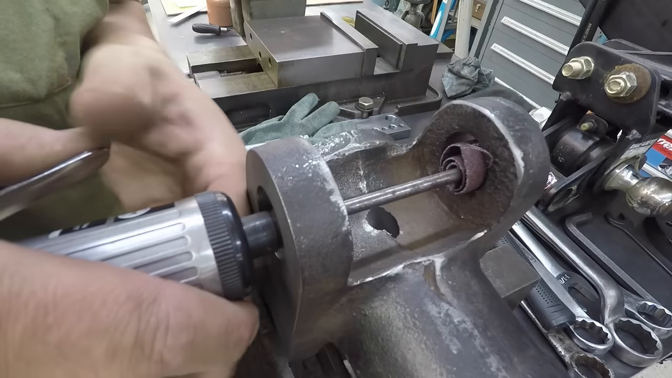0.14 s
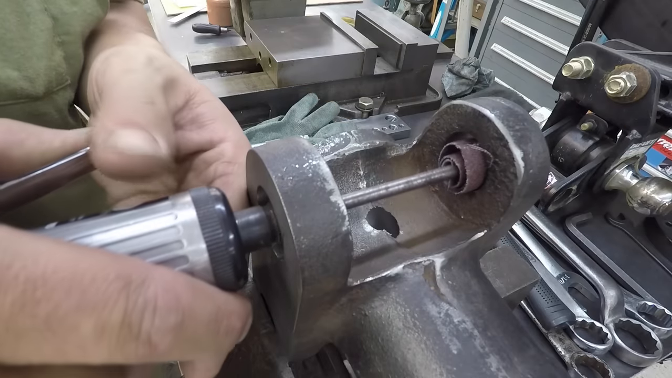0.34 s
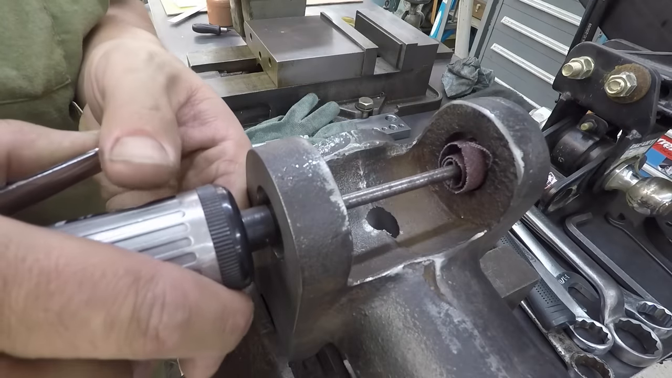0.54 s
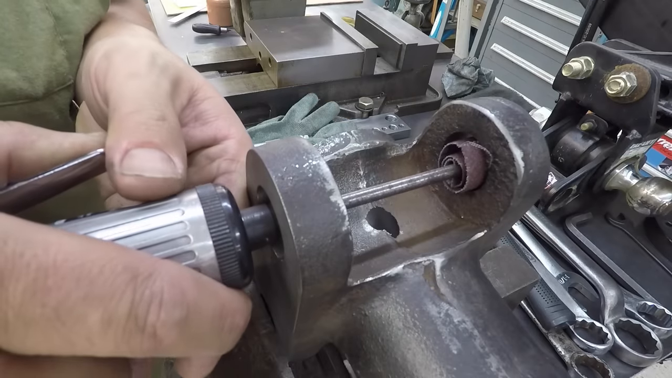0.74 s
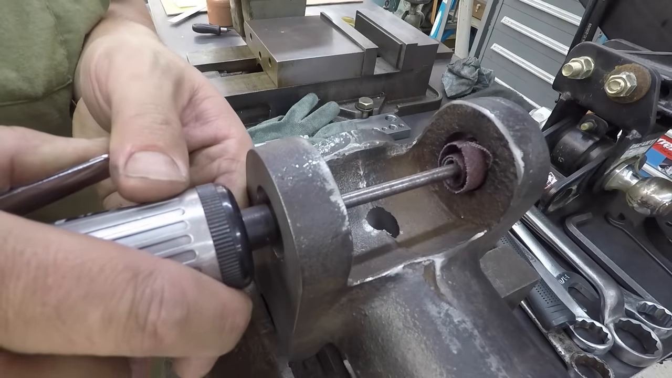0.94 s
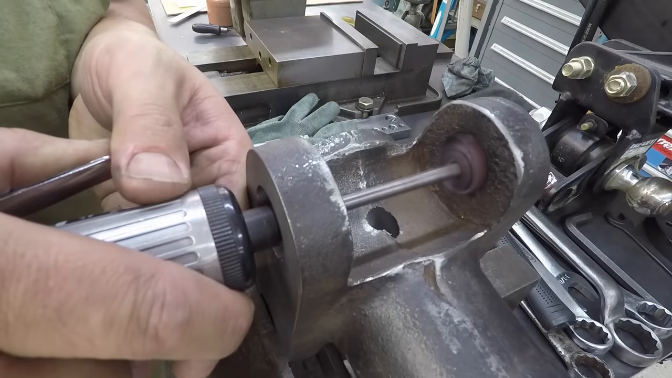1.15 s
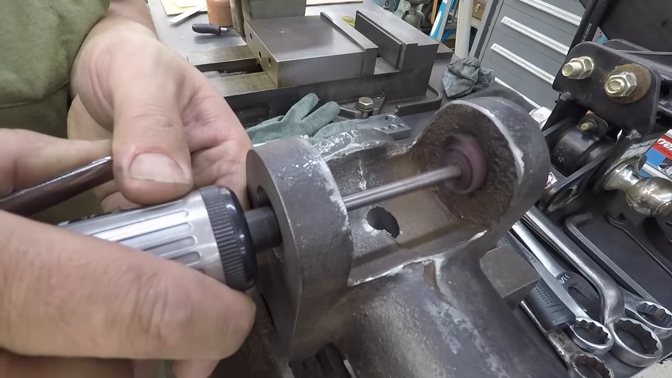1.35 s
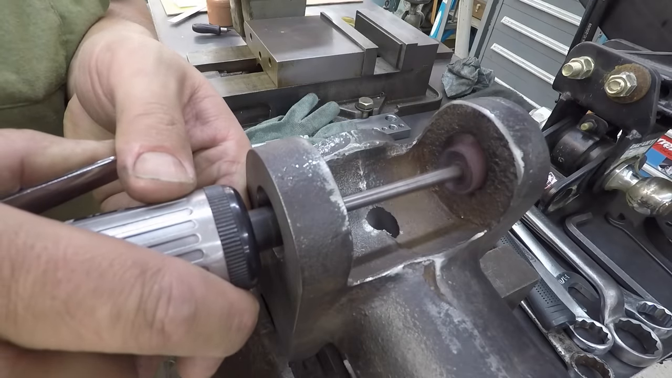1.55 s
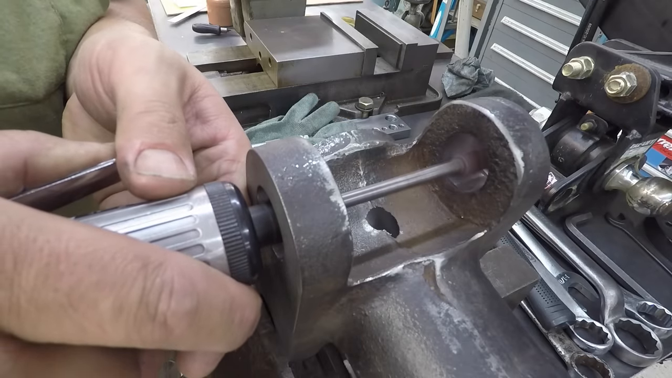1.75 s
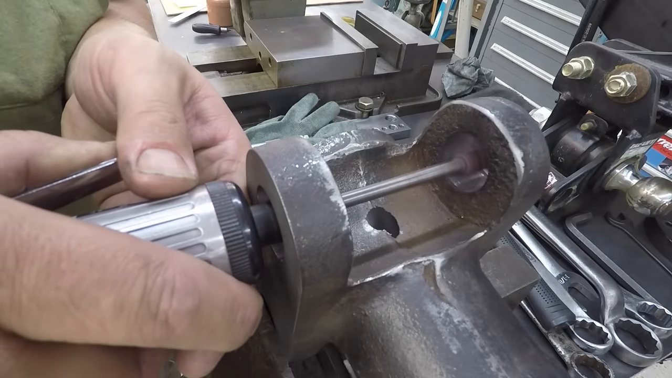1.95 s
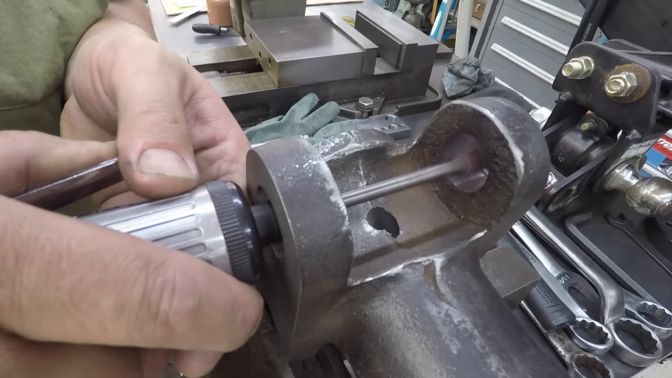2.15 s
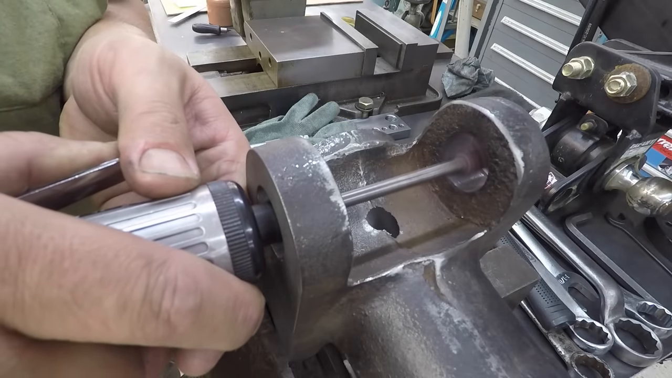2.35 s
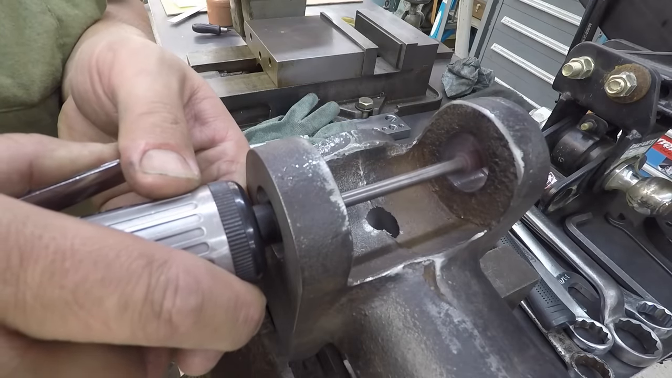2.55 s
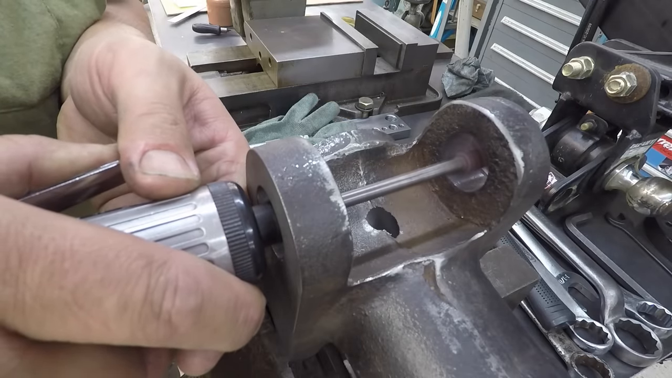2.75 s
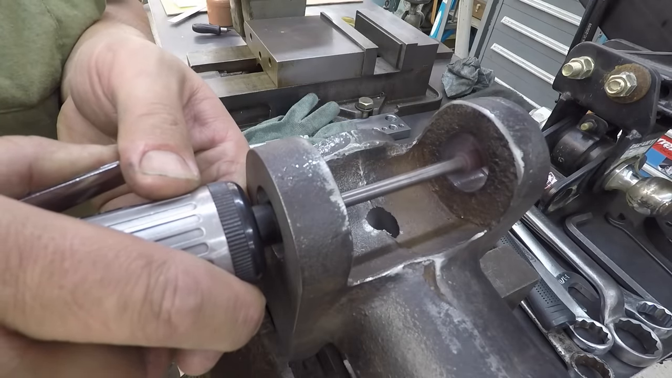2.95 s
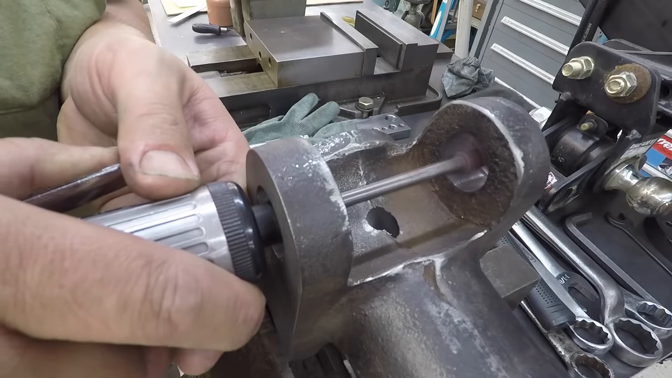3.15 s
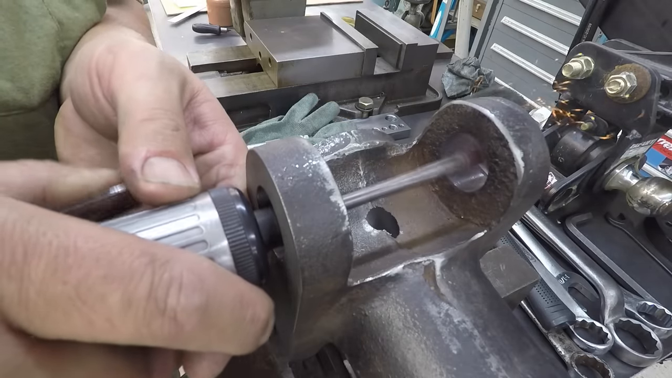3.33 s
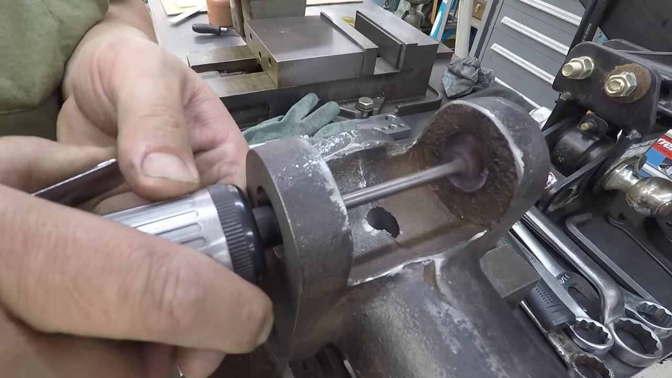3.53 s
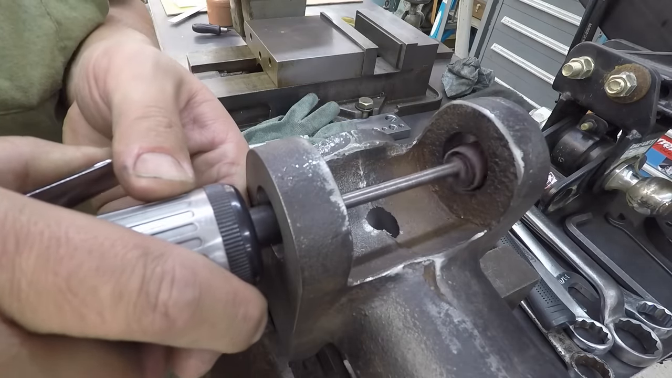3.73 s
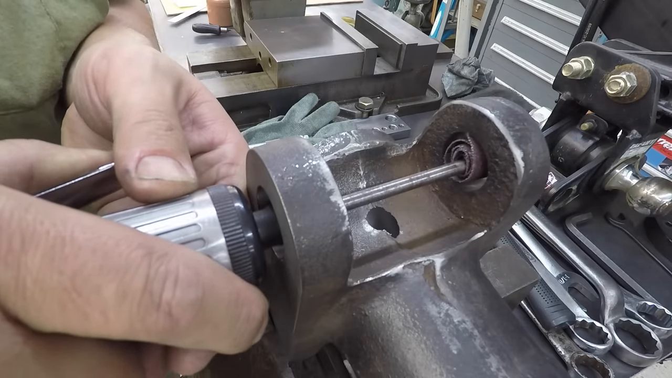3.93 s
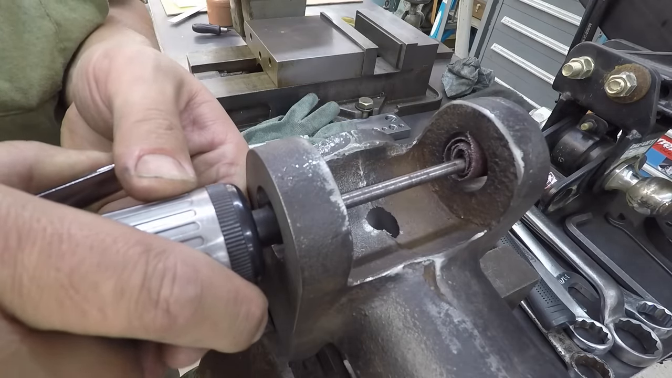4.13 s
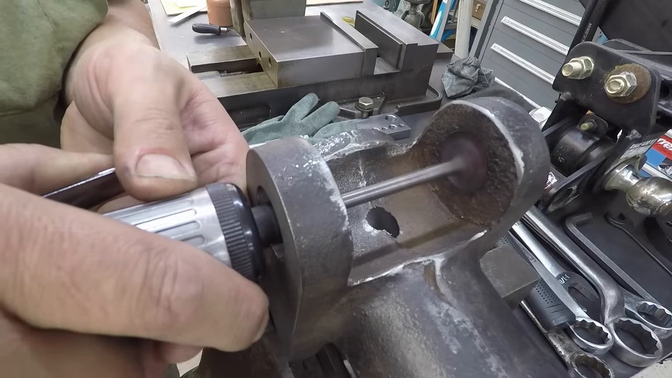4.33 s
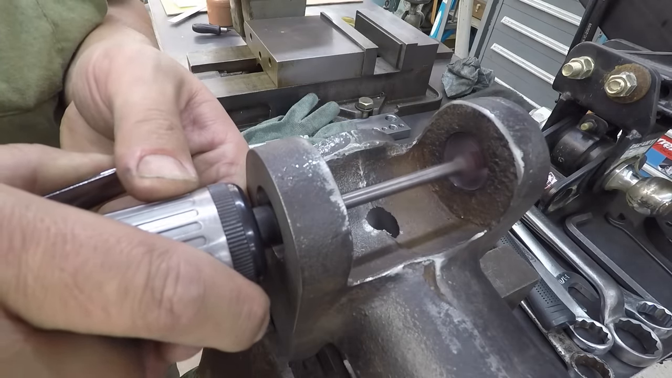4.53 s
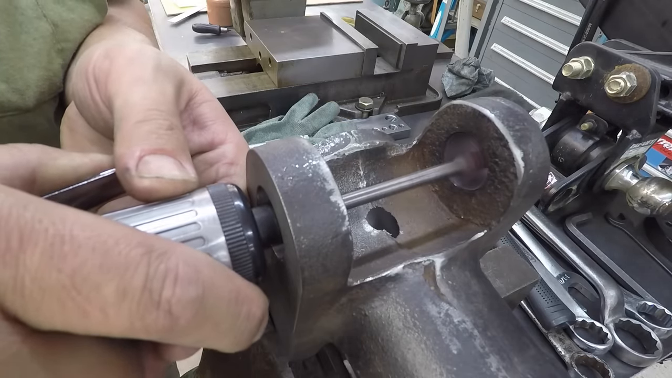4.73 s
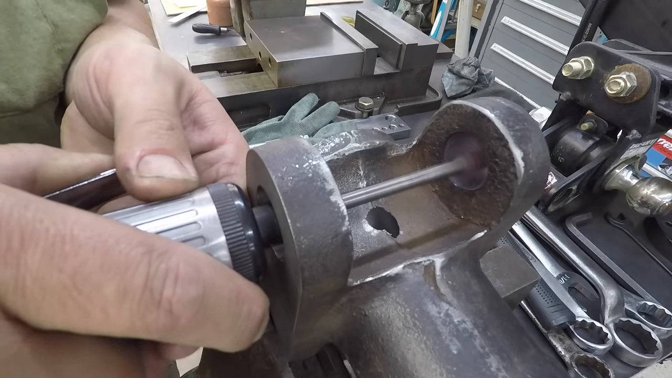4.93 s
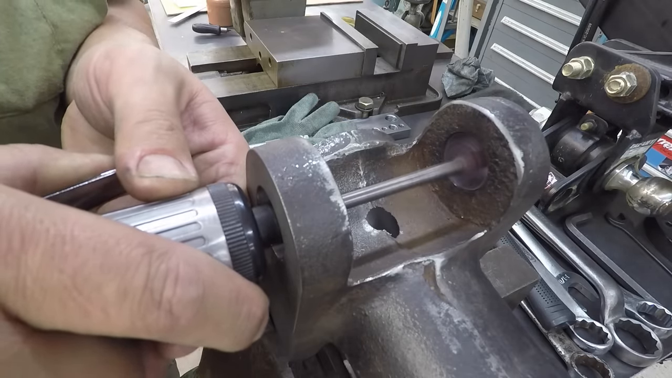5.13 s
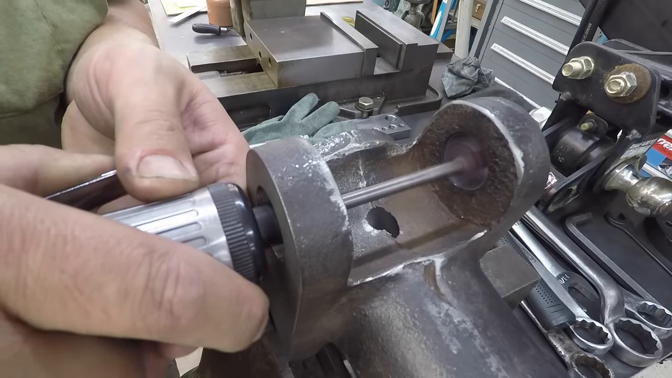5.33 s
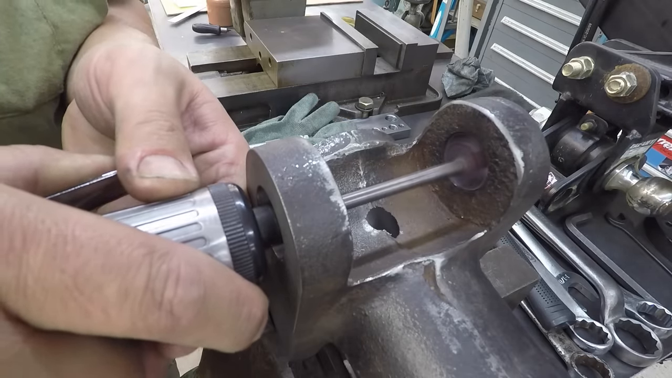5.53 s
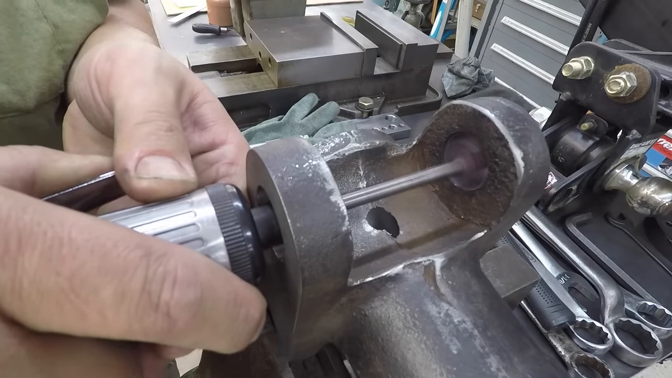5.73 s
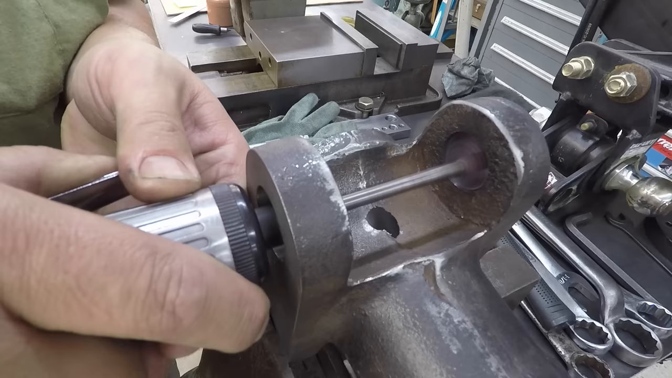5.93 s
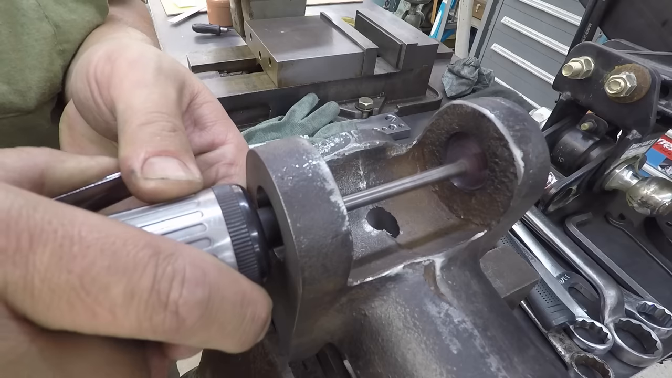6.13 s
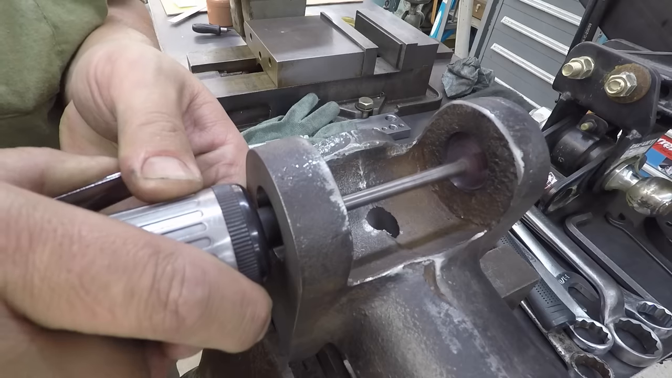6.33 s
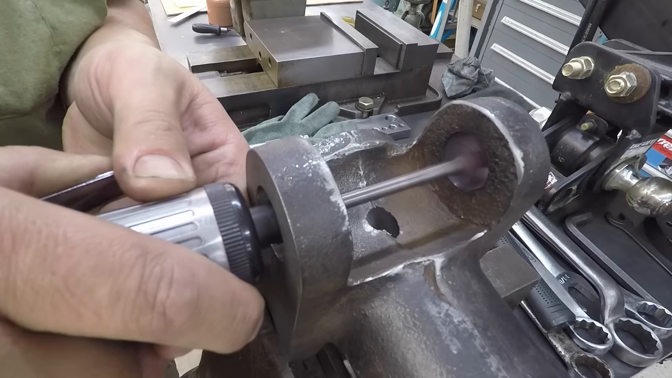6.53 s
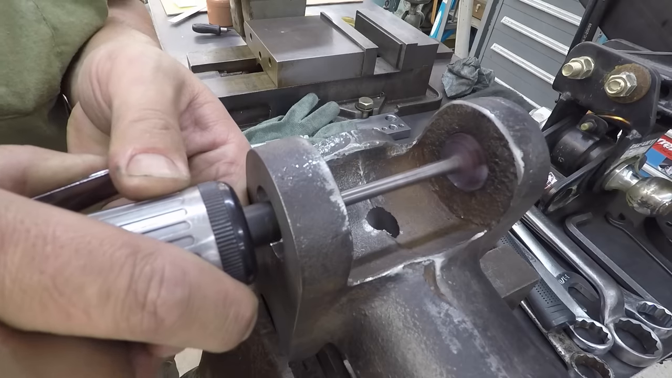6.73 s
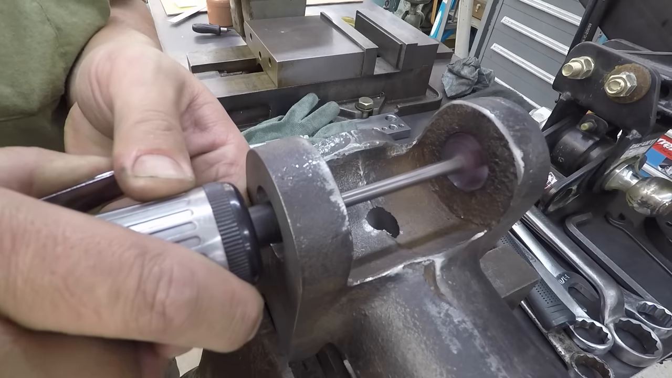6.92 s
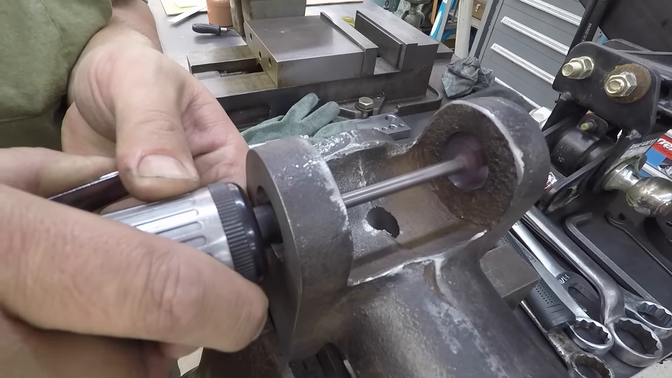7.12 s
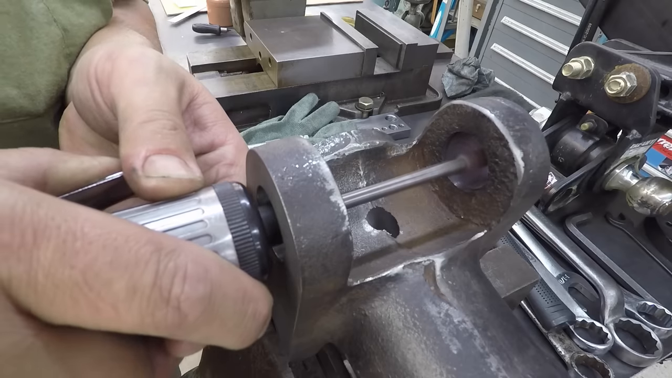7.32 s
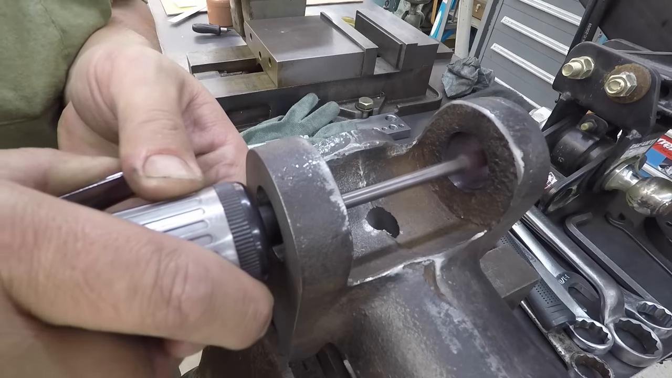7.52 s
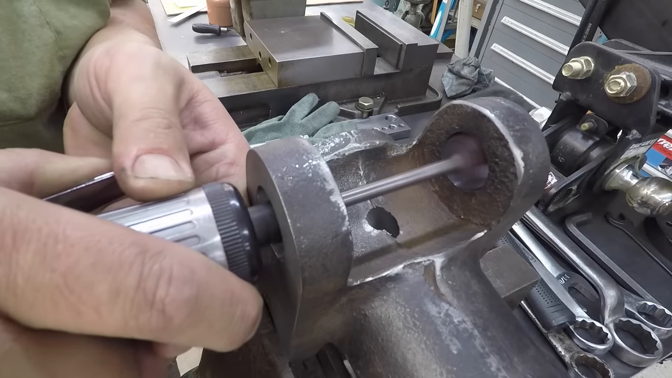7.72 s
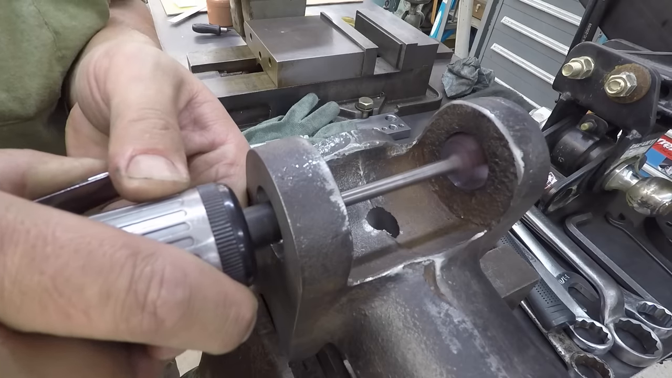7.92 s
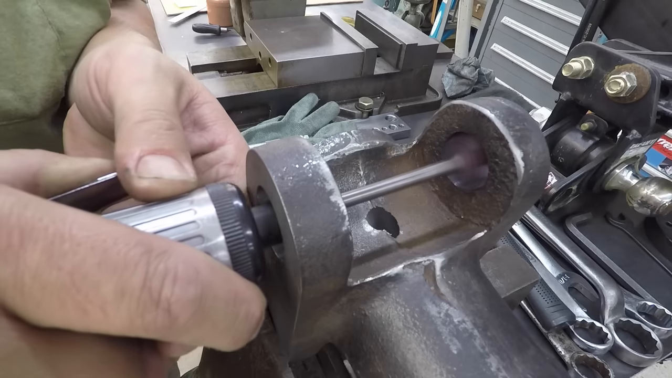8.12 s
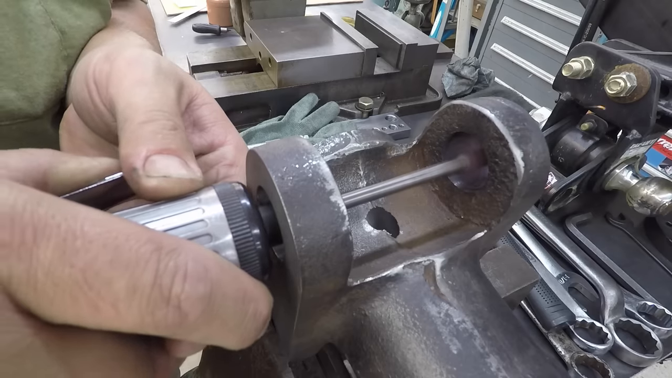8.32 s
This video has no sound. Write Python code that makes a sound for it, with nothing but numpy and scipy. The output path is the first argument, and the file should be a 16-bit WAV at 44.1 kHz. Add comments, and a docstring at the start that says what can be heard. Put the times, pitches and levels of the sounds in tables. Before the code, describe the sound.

After a quiet second, a pneumatic die grinder buzzes inside a steel bore, revs and stops, then starts again and runs on steadily.

```python
"""Air grinder in a steel bore

A four-vane rotor runs twice in a workshop: slow start, full speed, short race and stop, then a second start.
Each vane releases an air puff that rings exhaust resonances; filtered noise hisses with the vanes and the
shaft adds a hum with harmonics. The grip thuds as low decaying rings and a leak whistles in the pauses as a
wavering tone, over shaped room and microphone noise with faint switching tones; noise echoes the tool."""
import sys
import numpy as np
from scipy import signal
from scipy.fft import rfft, irfft, next_fast_len
from scipy.io import wavfile
from scipy.ndimage import uniform_filter1d

SR = 44100
rng = np.random.default_rng(int(sys.argv[2]) if len(sys.argv) > 2 else 0)


def dump_mix(stems):
    """Bounce the given channels to the path in sys.argv[1] as a 16-bit WAV at rate SR."""
    frames = np.atleast_2d(stems).T  # one column per channel
    limited = np.clip(frames, -1, 1)  # hard clip at full scale
    pcm = np.round(limited * 32767).astype(np.int16)
    wavfile.write(sys.argv[1], SR, pcm)


N = 373527


def from_db(db):
    """Decibels to amplitude gain."""
    return 10 ** (np.asarray(db) / 20)


def rms_one(x):
    """Scale to rms 1."""
    return x / np.sqrt(np.mean(x ** 2) + 1e-20)


def in_time(rows):
    """Columns of a time curve, interpolated to one value a sample."""
    time_s, *columns = np.transpose(rows)
    return [np.interp(np.arange(N) / SR, time_s, column) for column in columns]


def at_hz(points, hz):
    """Read a frequency curve on a log-frequency axis."""
    point_hz, value = np.array(points).T
    return np.interp(np.log(hz + 1), np.log(point_hz), value)


def drift(corner_hz):
    """Slow random wander, rms 1: two-pole low-passed noise at SR / 40, interpolated."""
    pole = np.exp(-80 * np.pi * corner_hz / SR)
    noise = rng.standard_normal(N // 40 + 2002)
    slow = signal.lfilter([1], [1, -2 * pole, pole * pole], noise)[2000:]   # filter settled
    return np.interp(np.arange(N) / 40, np.arange(len(slow)), rms_one(slow))


def resonate(x, modes, gaps):
    """Steep resonances side by side, cut by gaps, as a causal minimum-phase filter."""
    size = 4096
    hz = np.fft.rfftfreq(size, 1 / SR)
    power, cut_db = 0, 0
    for centre_hz, width_hz, top_db in modes:
        power = power + from_db(2 * top_db) / (1 + (2 * (hz - centre_hz) / width_hz) ** 2) ** 2
    for centre_hz, width_hz, depth_db in gaps:
        cut_db = cut_db + depth_db / (1 + (2 * (hz - centre_hz) / width_hz) ** 2)
    rise = hz / np.hypot(hz, 300)   # a small outlet radiates no steady flow
    magnitude = np.sqrt(power) * from_db(cut_db) * rise
    cepstrum = irfft(np.log(magnitude + 1e-5), size)
    cepstrum[1:size // 2] *= 2   # fold to minimum phase
    cepstrum[size // 2 + 1:] = 0
    impulse = irfft(np.exp(rfft(cepstrum)), size)
    return signal.oaconvolve(x, impulse)[:N]


def coloured(x, spectrum):
    """Filter noise by a spectrum; rms 1."""
    size = next_fast_len(N)
    gain = from_db(at_hz(spectrum, np.fft.rfftfreq(size, 1 / SR)))
    return rms_one(irfft(rfft(x, size) * gain, size)[:N])


# leak whistle: time_s, pitch_hz, level_db
LEAK_WHISTLE = [(0, 1556, -59), (.3, 1585, -72), (.55, 1560, -92), (3.7, 1505, -88), (3.8, 1440, -58.5),
                (4.0, 1460, -56), (4.17, 1450, -52), (4.25, 1460, -82)]


def leak():
    """Breathy whistle of wavering pitch and level, with a weak octave and a weak tone below."""
    pitch_hz, level_db = in_time(LEAK_WHISTLE)
    angle = 2 * np.pi * np.cumsum(pitch_hz * (1 + 0.0062 * drift(40))) / SR
    partials = .08 * np.sin(2 * angle) + .2 * np.sin(.532 * angle)
    return from_db(level_db + 4.5 * drift(40)) * (np.sin(angle) + partials)


# room and microphone noise spectrum: freq_hz, relative_db_per_hz
FLOOR_SPECTRUM = [(12, -37), (20, -4.5), (66, -10.5), (97, -14), (129, -14), (175, -30.5), (265, -26.5),
                  (288, -25), (900, -30), (1570, -31.5), (1750, -34.5), (6120, -43.5), (8540, -40.5),
                  (9280, -38.5), (15300, -33.5)]
# room and microphone noise level: time_s, rms_db
FLOOR_LEVEL_CURVE = [(0, -49.5), (.9, -50), (3.5, -61.5), (4.2, -54), (5.5, -54), (8.47, -55)]
# faint electronic tones: pitch_hz, peak_db
SWITCHING_TONES = [(8630, -67), (5066, -74)]


def background():
    """Room rumble and microphone hiss as shaped noise, with tones gated about 30 times a second."""
    t = np.arange(N) / SR
    on = (t * 30000 / 1001 + .2) % 1 < .52
    on = uniform_filter1d(on * 1., size=60)   # soft edges, samples
    tones = sum(from_db(peak_db) * np.sin(2 * np.pi * hz * t) for hz, peak_db in SWITCHING_TONES)
    floor = coloured(rng.standard_normal(N), FLOOR_SPECTRUM)
    return from_db(in_time(FLOOR_LEVEL_CURVE)[0]) * floor + on * tones


# rotor speed steps from trigger or load, each run: start_s, vane_pass_change_hz, lag_s
FIRST_RUN_STEPS = [(.902, -60.6, .234), (.908, 151.6, .0439), (1.615, 585.1, .0198), (1.816, 18.3, .0702),
                   (2.066, 37.9, .2631), (3.065, 61.1, .0203), (3.137, 122.3, .0106), (3.167, 301.5, .0083),
                   (3.304, -498.6, .0557), (3.333, -753.6, .0133)]
SECOND_RUN_STEPS = [(4.169, 413.4, .0566), (4.334, 68.6, .0103), (4.444, 9.4, .0039), (4.61, 109.1, .0276),
                    (4.721, 25.7, .0117), (4.731, 44.4, .0903), (5.012, 28.9, .2174), (6.846, 2.8, .0232)]
CREEP_HZ = 35   # slowest vane passing rate


def rotor_speed():
    """Vane passing rate in Hz: rotor inertia answers each step through a triple lag, from a creep."""
    t, runs = np.arange(N) / SR, []
    for steps in (FIRST_RUN_STEPS, SECOND_RUN_STEPS):
        vane_hz = CREEP_HZ
        for start_s, change_hz, lag_s in steps:
            u = np.maximum(t - start_s, 0) / lag_s
            vane_hz = vane_hz + change_hz * (1 - (1 + u + u * u / 2) * np.exp(-u))
        runs.append(vane_hz)
    return np.maximum(np.where(t < SECOND_RUN_STEPS[0][0], runs[0], runs[1]), CREEP_HZ)


# air blasts as the valve opens: start_s, exhaust_hiss_db, jet_hiss_db (before rise and decay)
VALVE_BLASTS = [(0.898, -20.5, -24), (4.17, -17.5, -33)]
# air flow with the valve open: time_s, exhaust_hiss_db, jet_and_grit_hiss_db
AIR_FLOW = [(.96, -30.5, -43), (1.07, -25, -31), (1.6, -28, -32.5), (1.66, -22.5, -30),
            (1.79, -30.5, -29.5), (2.11, -28.5, -31.5), (3.1, -27.5, -30.5), (3.2, -21.5, -22.5),
            (3.34, -19.5, -22.5), (4.25, -30.5, -38), (4.35, -24, -25.5), (4.48, -24.5, -28.5),
            (4.71, -22.5, -28), (4.95, -27.5, -30.5), (5.85, -28.5, -29), (8.47, -29.5, -29)]
# shaft hum by rotor speed, before run and surge offsets: vane_pass_hz, level_db
SHAFT_HUM = [(35, -69), (175, -63), (300, -57), (410, -31.5), (500, -42.5), (600, -32), (735, -36),
             (1245, -34)]
BLAST_RISE_S, BLAST_FALL_S = 0.022, 0.028
SHUT_S = 3.351
AIR_DROP_DB, AIR_DROP_S, AIR_FADE_DB_PER_S = -12.5, 0.0079, -140   # after the valve shuts
# surge: rotor gain in Hz a second over (vane_hz + SURGE_HZ)
PUFF_DB, PUFF_DB_PER_KHZ, SURGE_DB_S, SURGE_HZ = 21.5, -6, 0.5, 301
STUCK_DB, FREE_HZ, FREE_SPAN_HZ = -17, 49.6, 70   # weak puffs until the rotor runs free
# puffs break off at shutting, return from the trapped air and fade
BREAK_DB, BREAK_S, RETURN_S, COAST_DB, COAST_DB_PER_S = -24, .0045, 0.0073, 22, -200
HUM_FIRST_RUN_DB, HUM_SURGE_DB_S = -3.5, 1


def valve(vane_hz):
    """Gains of exhaust hiss, jet and hum, and puff level in dB, from valve state and rotor speed."""
    t = np.arange(N) / SR
    first_open_s, second_open_s = VALVE_BLASTS[0][0], VALVE_BLASTS[1][0]
    coasting = (t > SHUT_S) & (t < second_open_s)
    shut_for_s = np.where(coasting, t - SHUT_S, 0)

    opened, blast = 0, 0
    for start_s, *levels_db in VALVE_BLASTS:
        since_s = np.maximum(t - start_s, 0)
        rise = np.clip(since_s / BLAST_RISE_S, 0, 1) ** 2
        opened = np.where(t > start_s, rise, opened)
        blast = blast + rise * np.exp(-since_s / BLAST_FALL_S) * from_db(levels_db)[:, None]
    shut_db = AIR_DROP_DB * np.clip(shut_for_s / AIR_DROP_S, 0, 1) + AIR_FADE_DB_PER_S * shut_for_s
    flow = opened * from_db(shut_db)
    hiss_gain, jet_gain = np.hypot(flow * from_db(in_time(AIR_FLOW)), blast)

    surge = np.maximum(np.gradient(vane_hz) * SR / (vane_hz + SURGE_HZ), 0)
    stuck_db = STUCK_DB * np.clip(1 - (vane_hz - FREE_HZ) / FREE_SPAN_HZ, 0, 1)
    unopened_db = -90 * (t < first_open_s)
    driven_db = PUFF_DB + PUFF_DB_PER_KHZ * vane_hz / 1000 + SURGE_DB_S * surge + stuck_db + unopened_db
    coast_db = COAST_DB + COAST_DB_PER_S * shut_for_s
    break_span_s = np.where(coasting, RETURN_S, BREAK_S)
    break_db = BREAK_DB * np.exp(-((t - SHUT_S) / break_span_s) ** 2)
    puff_db = np.where(coasting, coast_db, driven_db) + break_db

    hum_db = at_hz(SHAFT_HUM, vane_hz) + HUM_FIRST_RUN_DB * (t < second_open_s) + HUM_SURGE_DB_S * surge
    return hiss_gain, jet_gain, flow * from_db(hum_db), puff_db


def puffs(passes, strength):
    """One band-limited pulse per whole step of the pass count, placed between samples."""
    at = np.flatnonzero(np.diff(np.floor(passes)) > 0)
    late = (np.floor(passes[at + 1]) - passes[at]) / (passes[at + 1] - passes[at])
    taps = np.arange(-8, 9)
    offset = taps - late[:, None]
    pulse = np.sinc(offset) * np.cos(np.pi * offset / 18) ** 2   # windowed sinc
    out = np.zeros(N + 16)
    np.add.at(out, at[:, None] + taps + 8, strength[at, None] * pulse)
    return out[8:N + 8]


# single puffs as the rotor breaks loose: start_s, pulse_db
LOOSE_POPS = [(0.926, 20), (0.951, 20), (0.978, 18), (0.993, 21), (1.034, 14), (1.626, 31.5), (4.202, 26.5),
              (4.229, 18), (4.261, 27.5), (4.287, 23)]
# exhaust resonances rung by puffs, low, middle, upper, high: centre_hz, width_hz, top_db
OUTLET_MODES = [(330, 530, -4), (601, 530, 0.5), (797, 620, -0.5), (1393, 1010, -6)]
BORE_MODES = [(2117, 44, -17.5), (2520, 316, -8.5), (3050, 530, -18.5), (3410, 230, -15), (3890, 370, -18)]
UPPER_BORE_MODES = [(4440, 480, -28.5), (4740, 300, -19.5), (5260, 270, -23.5)]
WHINE_MODES = [(5808, 530, -12.5), (6300, 360, -22.5), (7550, 500, -30.5), (9050, 240, -32),
               (9600, 340, -35.5), (11310, 920, -27.5), (14300, 1600, -36.5)]
# fewer resonances, softly puffed by a barely turning rotor: centre_hz, width_hz, top_db
CRAWL_MODES = [(176, 180, -7.5), (367, 140, -14.5), (503, 160, -4), (688, 123, -0.5), (916, 220, -8),
               (1450, 225, -5), (2400, 350, -16.5), (3640, 1300, -25)]
# side cavities that swallow sound; the bore gap also cuts the hiss: centre_hz, width_hz, depth_db
OUTLET_CAVITIES = [(1110, 110, -12), (1740, 200, -8)]
BORE_CAVITY = [(2270, 110, -8)]
# resonance group drift: time_s, middle_db, upper_db, high_db
GROUP_LEVELS = [(1.6, -1, -6, -8), (1.8, 4, 1, 0.5), (2.4, 5, -4, -1), (2.8, 2.5, 1, 0.5),
                (3.14, 3, -2, -2.5), (3.22, 5.5, -6, -5), (3.35, -2, -10, -8), (3.4, -13, -14, -18),
                (4.3, 4, -6, -5), (4.6, 3.5, -13, -9), (4.9, 3.5, 0, -1), (5.2, 5.5, 3, -1.7),
                (5.6, 1, -5, -2), (6.2, 1, 4.5, -1.5), (8.47, -1, 2, 0)]


def exhaust(vane_hz, shaft, passes, puff_db):
    """Vane puffs ring the exhaust passages; crawling and free rotors excite different resonances."""
    crawling = np.clip((235 - vane_hz) / 50, 0, 1)
    # unequal vanes: strength repeats once a turn, more so when crawling
    throb_db = 3.0 * crawling * np.cos(shaft)
    uneven_db = throb_db + 0.34 * np.cos(shaft) + (.12 + 0.89 * crawling) * np.cos(2 * shaft + 1.3)
    sputter_db = 2.2 * np.clip((150 - vane_hz) / 60, 0, 1)
    scatter_db = (.3 + 1.2 * crawling + sputter_db) * rng.standard_normal(N)
    strength = -from_db(puff_db + uneven_db + scatter_db)

    # racing: a counter-stroke half a pass later thins the even harmonics
    racing = 0.7 * np.clip((vane_hz - 780) / 200, 0, 1)
    fast = puffs(passes, (1 - crawling) * strength) - puffs(passes + .5, racing * strength)
    slow = puffs(passes, crawling * strength)
    for start_s, pulse_db in LOOSE_POPS:
        slow[round(start_s * SR) + 60] += from_db(pulse_db)   # 60 samples late
    # loose end of the abrasive roll slaps the bore once a turn
    slaps = puffs(shaft / (2 * np.pi) + 0.126, from_db(-8.5) * (1 - crawling) * strength)
    bright = fast + slaps

    bore_db, upper_db, whine_db = in_time(GROUP_LEVELS)
    low = resonate(fast, OUTLET_MODES, OUTLET_CAVITIES)
    middle = resonate(from_db(bore_db) * bright, BORE_MODES, BORE_CAVITY)
    upper = resonate(from_db(upper_db) * bright, UPPER_BORE_MODES, [])
    high = resonate(from_db(whine_db) * bright, WHINE_MODES, [])
    crawl = resonate(slow, CRAWL_MODES, BORE_CAVITY)
    return low + middle + upper + high + crawl


# exhaust passages as turbulent air colours them: centre_hz, width_hz, relative_db
TURBULENCE_MODES = [(139, 81, 1), (450, 160, -37.5), (860, 180, 2.5), (1278, 700, 6), (1940, 1600, -0.5),
                    (2650, 710, 8.5), (2930, 630, 3), (3550, 374, 13.5), (3980, 630, 4), (4680, 830, 2),
                    (5780, 390, 5.5), (6600, 500, -55.5)]
# jet colour as the hands move: time_s, list of (freq_hz, relative_db_per_hz)
JET_SPECTRA = [(2.498, [(3820, -18.5), (6500, 2), (6780, 0.5), (7470, -8.5), (9140, 0), (10000, -5.5),
               (11200, 1), (13200, -3.5), (14700, -1.5), (15200, -6.5)]), (4.6, [(3820, -9), (6500, -1.5),
               (7360, -7), (8580, -10), (9340, -7), (10100, -6.5), (11600, 0.5), (13100, -8), (13900, -3.5),
               (15200, -8)]), (7.0, [(3820, 2.5), (6500, 4.5), (8280, -11), (8550, -3), (9540, 6.5),
               (10400, -6), (11400, 1.5), (13100, -1), (14100, 0), (14700, -2), (15200, -11)])]
VANES = 4


def motor():
    """Puffs, gated hiss and shaft hum, all driven by the rotor's angle."""
    vane_hz = rotor_speed()
    hiss_gain, jet_gain, hum_gain, puff_db = valve(vane_hz)
    shaft = 2 * np.pi * np.cumsum(vane_hz * (1 + .0006 * drift(25))) / SR / VANES
    # unequal vane spacing repeats once a turn
    passes = VANES * shaft / (2 * np.pi) - .015 * np.sin(shaft) + 0.0035 * np.sin(2 * shaft)

    # hiss swells as each vane opens and once a turn
    gate = (1 + 0.095 * np.cos(2 * np.pi * passes - .8)) * (1 + 0.086 * np.cos(shaft - .4))
    gated_noise = rng.standard_normal(N) * gate * from_db(1.2 * drift(25))
    hiss = rms_one(resonate(gated_noise, TURBULENCE_MODES, BORE_CAVITY))

    jet_gate = (1 + 0.13 * np.cos(shaft - .4)) * (1 + .1 * np.cos(2 * np.pi * passes))
    jet_noise = rng.standard_normal(N) * jet_gate
    times_s = [time_s for time_s, spectrum in JET_SPECTRA]
    shares = in_time(np.column_stack([times_s, np.eye(len(times_s))]))   # crossfade weights
    jet = sum(share * coloured(jet_noise, spectrum) for share, (time_s, spectrum) in zip(shares, JET_SPECTRA))
    jet = signal.sosfilt(signal.butter(4, 4500, "high", fs=SR, output="sos"), jet)

    hum = np.sqrt(2) * (np.sin(shaft) + 0.4 * np.sin(2 * shaft) + 0.3 * np.sin(3 * shaft))
    air = hiss_gain * hiss + jet_gain * jet
    return exhaust(vane_hz, shaft, passes, puff_db) + air + hum_gain * hum


# workshop echo decay: freq_hz, t60_s
ECHO_DECAY = [(100, 1), (500, 0.3), (1240, 0.81), (3000, 0.86), (8000, 0.68), (15000, 0.49)]


def workshop(x):
    """Diffuse echo: unit-energy noise that dies away band by band."""
    t, echo = np.arange(SR) / SR, 0
    edges_hz = 60 * 2 ** np.arange(0, 8.1, 1)
    for low_hz, high_hz in zip(edges_hz, edges_hz[1:]):
        octave = signal.butter(2, [low_hz, high_hz], "band", fs=SR, output="sos")
        band = signal.sosfilt(octave, rng.standard_normal(SR))
        t60_s = at_hz(ECHO_DECAY, np.sqrt(low_hz * high_hz))
        echo = echo + band * from_db(-60 * t / t60_s)
    echo = echo * np.clip((t - .006) / 0.014, 0, 1)   # first walls answer after a few ms
    return signal.fftconvolve(x, echo / np.sqrt(np.sum(echo ** 2)))[:N]


# grip thuds: start_s, level_db, pitch_hz, t60_s
GRIP_THUDS = [(1.65, -42, 50.4, .25), (1.69, -33, 80, 0.24), (3.155, -30, 40.3, 0.27),
              (3.358, -23, 35.7, 0.12), (3.40, -37, 96, 0.59), (4.37, -40, 70, .3), (4.45, -40, 60, .3),
              (4.6, -47, 70, .3), (4.7, -43, 55, 0.27), (3.2, -36, 70.5, 0.45)]


def grip():
    """Each thud is a low decaying sine with a soft start."""
    out, t = np.zeros(N), np.arange(SR // 2) / SR
    for start_s, level_db, pitch_hz, t60_s in GRIP_THUDS:
        decay = from_db(level_db - 60 * t / t60_s)
        attack = 1 - np.exp(-t / 0.0031)
        start = round(start_s * SR)
        out[start:start + len(t)] += np.sin(2 * np.pi * pitch_hz * t) * decay * attack
    return out


def scene():
    """The tool close by, its echo, grip, leak and the quiet room."""
    tool = motor()
    echo = from_db(-16) * workshop(tool)
    return (tool + echo + grip() + leak() + background())[None]


CUTOFF_HZ = 15300


def record(dry):
    """Round the peaks by tanh, then cut the top by a steep low-pass."""
    rounded = 1.2 * np.tanh(dry / 1.2)
    low_pass = signal.ellip(12, .5, 70, CUTOFF_HZ, fs=SR, output="sos")   # ripple dB, stopband dB
    return signal.sosfilt(low_pass, rounded)


dry = scene()
out = record(dry)
dump_mix(out)
```